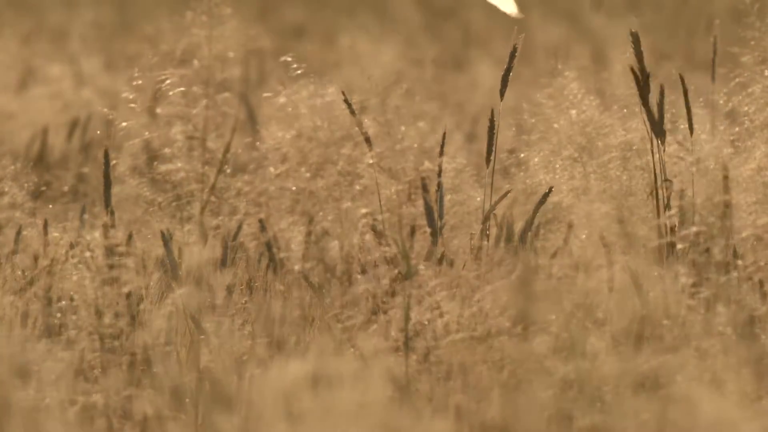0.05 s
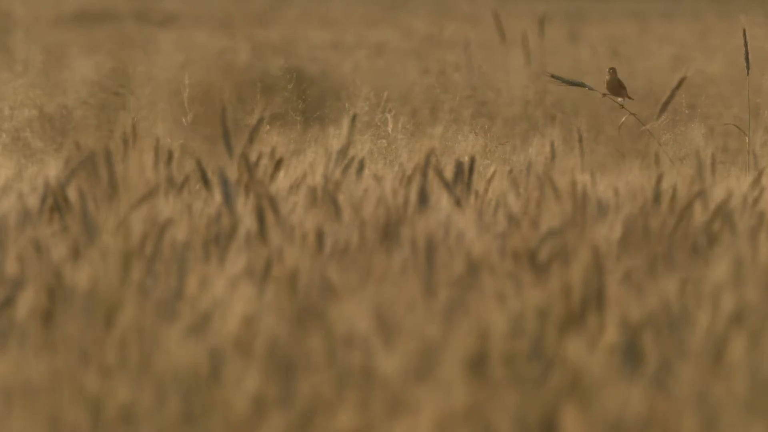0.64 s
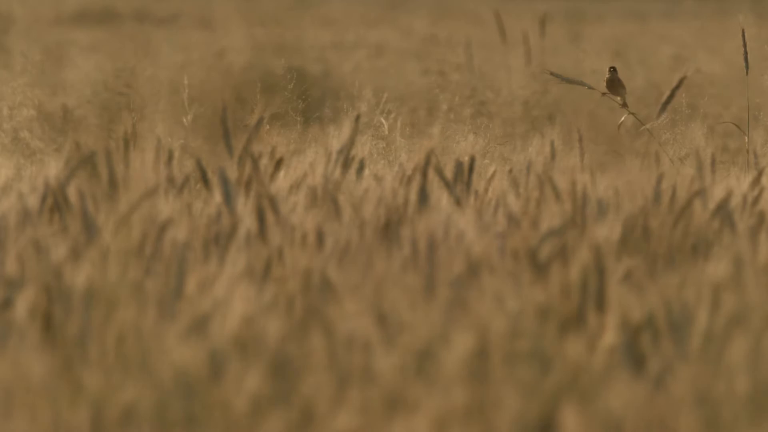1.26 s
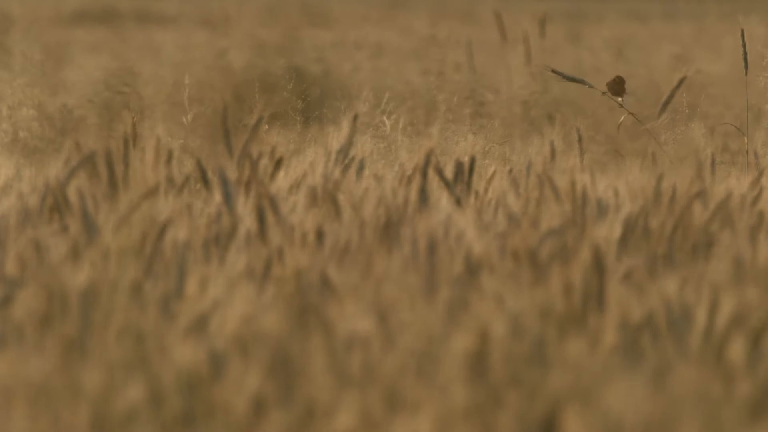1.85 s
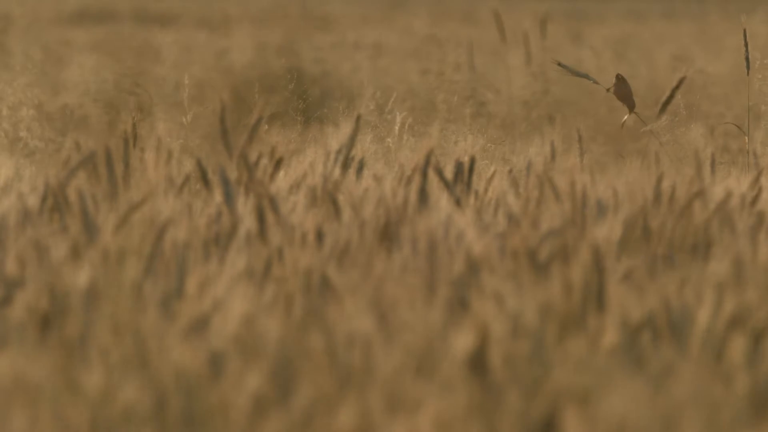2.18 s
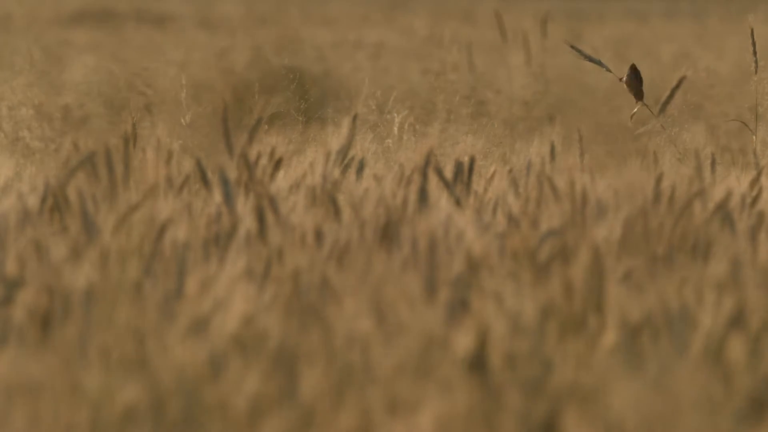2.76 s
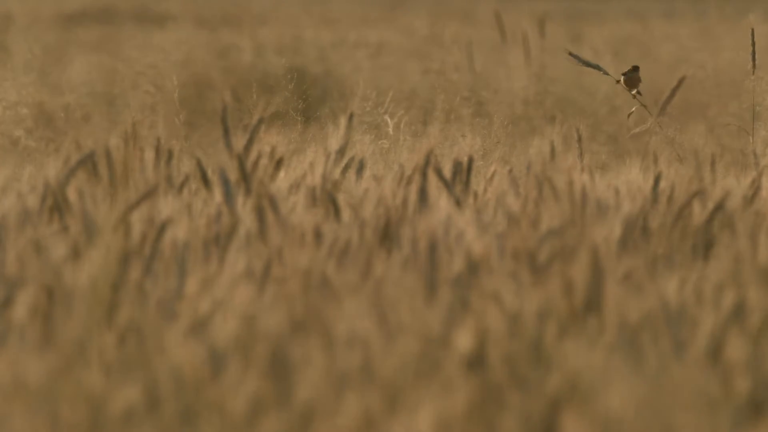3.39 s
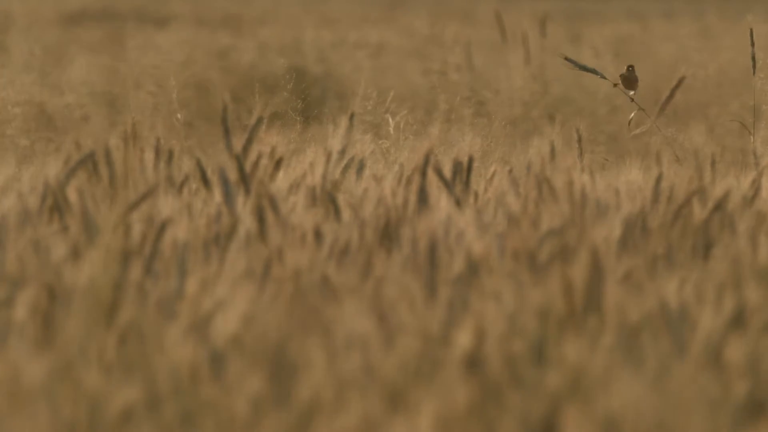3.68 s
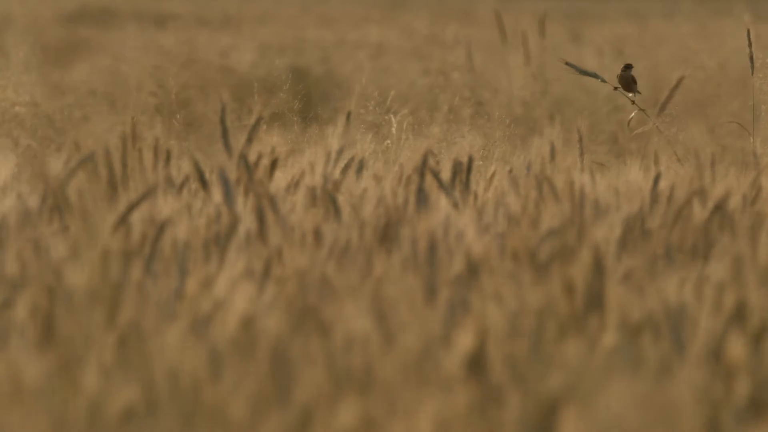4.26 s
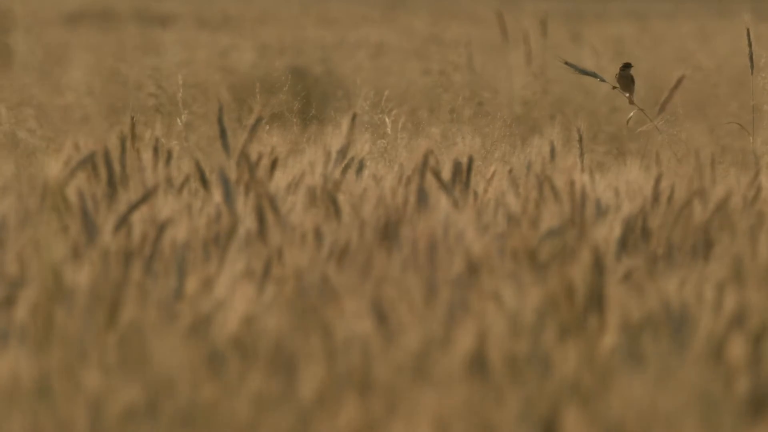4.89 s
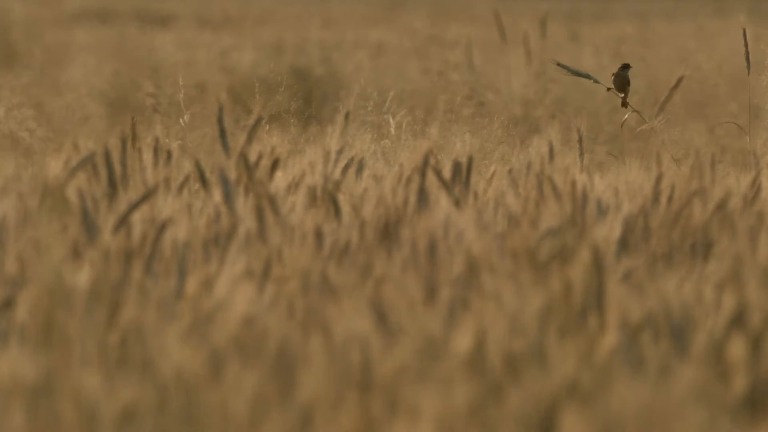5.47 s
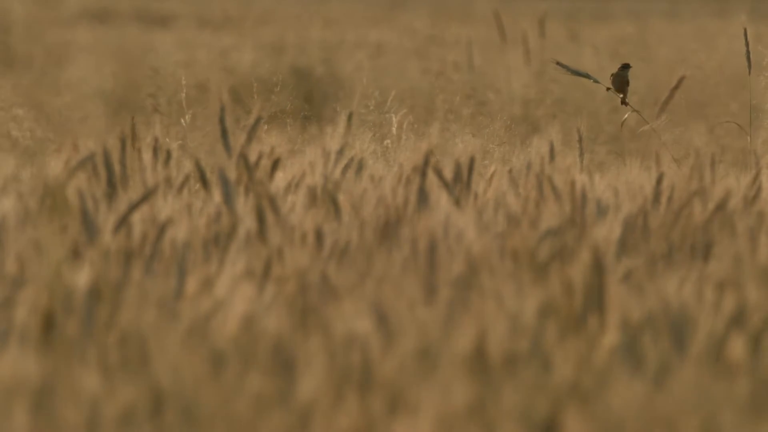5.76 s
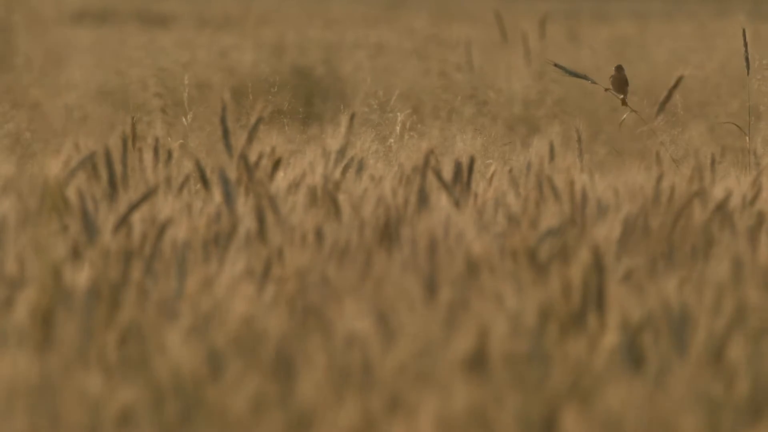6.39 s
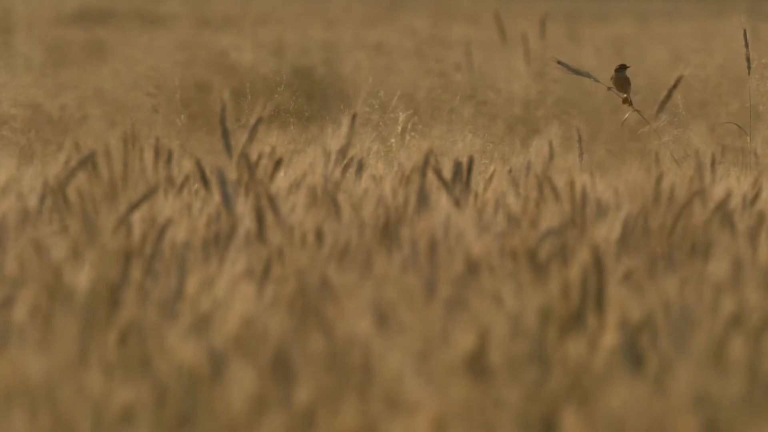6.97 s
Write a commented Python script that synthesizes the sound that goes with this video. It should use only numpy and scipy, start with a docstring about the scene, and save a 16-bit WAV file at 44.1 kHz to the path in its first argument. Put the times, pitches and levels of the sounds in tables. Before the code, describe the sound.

A small bird sings a long, hurried song of chirps, buzzy trills and whistles in an open field over a faint low rumble.

```python
"""A small bird sings a long, hurried song from a stalk in a grain field: slurs, chips and buzzy trills.
Its syrinx glides a near-pure tone; fast pitch sweeps, muted on the upstroke, make the buzz.
The stalks scatter each note and the open field adds a faint tail.
Under it lie a distant rumble, a faint hum, even hiss, a gust buffeting the microphones, and far birds."""
import sys
import numpy as np
from scipy import signal
from scipy.fft import rfft, irfft
from scipy.io import wavfile

SR = 44100
rng = np.random.default_rng(int(sys.argv[2]) if len(sys.argv) > 2 else 0)


def output_pcm(signal):
    """Save a mono or channel-first signal as 16-bit PCM at the path in sys.argv[1].

    Samples are clipped to [-1, 1] before scaling.
    """
    pcm = np.clip(np.atleast_2d(signal).T, -1, 1) * 32767
    wavfile.write(sys.argv[1], SR, np.round(pcm).astype(np.int16))


N = 319283
TIME = np.arange(N) / SR
FREQS = np.fft.rfftfreq(N, 1 / SR)


def gain_of(db):
    return 10 ** (np.asarray(db) / 20)


def unit_rms(x):
    return x / np.sqrt(np.mean(x ** 2) + 1e-20)


def over_freqs(points):
    hz, value = np.transpose(points)
    return np.interp(np.log(FREQS + 1), np.log(hz + 1), value)


def envelope(points):
    return gain_of(np.interp(TIME, *np.transpose(points)))


def add(mix, start_s, sound):
    part = mix[max(0, round(start_s * SR)):][:len(sound)]
    part += sound[:len(part)]


def wander(cutoff_hz):
    """Low-passed random drift, rms 1."""
    return unit_rms(irfft(rfft(rng.standard_normal(N)) / (1 + (FREQS / cutoff_hz) ** 4), N))


def stereo_noise(spectrum, correlation):
    """Shaped left and right noise, rms 1."""
    left, independent = rfft(rng.standard_normal((2, N)))
    right = correlation * left + np.sqrt(1 - correlation ** 2) * independent
    return unit_rms(irfft(np.array([left, right]) * gain_of(over_freqs(spectrum)), N))


def scatter(sound, delay_s, t60_s):
    """Many weak, decaying reflections, different at each microphone."""
    t = np.arange(SR) / SR
    taps = rng.standard_normal((2, SR)) * (t > delay_s) * gain_of(-60 * t / t60_s)
    taps /= np.linalg.norm(taps, axis=1, keepdims=True)
    return signal.fftconvolve(sound[None], taps, axes=1)[:, :N]


# rumble spectrum: freq_hz, relative_db
RUMBLE_SPECTRUM = [(12, -47.5), (20, -3.5), (25, -8), (32, -11), (69, -10), (97, -17), (152, -21.5),
                   (307, -28), (671, -32.5), (1700, -40), (2210, -70), (3740, -120)]
# left-right likeness: freq_hz, correlation
RUMBLE_CORRELATION = [(60, 0.16), (110, 0.27), (220, -0.0011), (420, 0.078), (810, 0.0069), (1550, 0.022),
                      (2970, 0.74), (5690, 0.63)]
def distant_rumble(level_db=-52):
    """Steady low noise of the air over the field."""
    return gain_of(level_db) * stereo_noise(RUMBLE_SPECTRUM, over_freqs(RUMBLE_CORRELATION))


# hum envelope: time_s, level_db
HUM_LEVELS = [(0, -73.5), (3.8, -73), (4.3, -65), (5.2, -68.5), (6, -80)]
def distant_hum(pitch_hz=154.4, waver=0.01205):
    """One low, wavering tone."""
    wavering_hz = pitch_hz * (1 + waver * wander(7.82))
    return envelope(HUM_LEVELS) * unit_rms(np.sin(2 * np.pi * np.cumsum(wavering_hz) / SR))


# hiss spectrum: freq_hz, relative_db
HISS_SPECTRUM = [(1300, -36), (1800, 4), (3000, 1.5), (5000, -1.5), (7000, -5), (10000, -5.5), (15500, -8)]
def hiss(level_db=-66.5):
    """Even, wide treble noise."""
    return gain_of(level_db) * stereo_noise(HISS_SPECTRUM, correlation=0.066)


# gust envelope: time_s, level_db
GUST_LEVELS = [(0, -46), (2.9, -53), (3.7, -39.5), (4.4, -44.5), (4.8, -30), (5.4, -26), (5.85, -33.5),
               (6.2, -19), (6.6, -29), (6.8, -29.5), (7.2, -34)]
# buffeting spectrum: freq_hz, relative_db
BUFFET_SPECTRUM = [(1, -24.5), (6, 2.5), (14, -7), (26, -17.5), (42, -31.5), (100, -57.5), (250, -101)]
def wind(left_db=2.5, right_db=-0.6):
    """Slow eddies push on both microphones, mostly below hearing."""
    eddies = stereo_noise(BUFFET_SPECTRUM, correlation=1.0)
    return envelope(GUST_LEVELS) * gain_of([[left_db], [right_db]]) * eddies


# far twittering: start_s, end_s, pitch_hz, spread_hz, notes_per_s, level_db
TWITTERS = [(0, 7.2, 4970, 171, 60, -70), (0, 7.2, 3304, 350, 60, -68), (0.98, 1.16, 5740, 300, 40, -66),
            (1.2, 1.76, 7260, 500, 45, -73)]
def far_birds(shortest_s=0.0045, extra_s=0.0251, spread_db=3, direct_db=-5):
    """Short random slurs from across the field, half lost in their own echo."""
    song = np.zeros(N)
    for start_s, end_s, pitch_hz, spread_hz, notes_per_s, level_db in TWITTERS:
        for k in range(int((end_s - start_s) * notes_per_s)):
            size = int(SR * (shortest_s + extra_s * rng.random()))
            glide_hz = np.linspace(*rng.normal(pitch_hz, spread_hz, 2), size)
            slur = np.hanning(size) * np.sin(2 * np.pi * np.cumsum(glide_hz) / SR)
            onset_s = start_s + (k + rng.random()) / notes_per_s
            add(song, onset_s, gain_of(rng.normal(level_db, spread_db)) * slur)
    return gain_of(direct_db) * song + scatter(song, delay_s=0.0032, t60_s=0.26)


def syrinx(note, drift, edge_s=0.0007, jitter=0.0082, shimmer_db=1.0, depth_jitter=0.11, overtone_db=-44):
    """A near-pure tone on a pitch arc; in a trill it sweeps down and snaps back, muted."""
    start_s, length_s, *arc_points_hz, level_db, swell_db, sweeps_per_s, depth_hz, falling, muting = note
    t = np.arange(int(length_s * SR)) / SR
    progress = t / length_s
    pitch_drift, level_drift, depth_drift = drift[:, (int(start_s * SR) + np.arange(len(t))) % N]
    cycle = sweeps_per_s * (t + 0.055 / 150 * level_drift) % 1  # the fastest buzzes are the least even
    falling = np.clip(falling, .05, .95)
    arc_hz = np.polyval(np.polyfit([0, .5, 1], arc_points_hz, 2), progress)
    sweep_hz = depth_hz * (1 + depth_jitter * depth_drift) * np.interp(cycle, [0, falling, 1], [1, -1, 1])
    phase = 2 * np.pi * np.cumsum(arc_hz * (1 + jitter * pitch_drift) + sweep_hz) / SR
    tone = np.sin(phase) + gain_of(overtone_db) * np.sin(2 * phase)
    shut = np.interp(cycle / falling, [0, .2, .8, 1], [1, 0, 0, 1])
    pressure = np.sin(np.pi * progress) ** 0.16 * np.minimum(1, np.minimum(t, length_s - t) / edge_s)
    gain = gain_of(level_db + swell_db * (progress - .5) + shimmer_db * level_drift)
    return gain * pressure * (1 - muting * shut) * tone


def throat_tilt_db(from_hz, to_hz, best_hz=3830, octave_off_db=-11.5):
    """A glide swells as it nears the throat's best pitch and fades as it leaves it."""
    return octave_off_db * (np.log2(to_hz / best_hz) ** 2 - np.log2(from_hz / best_hz) ** 2)


def whistle(start_s, length_s, from_hz, mid_hz, to_hz, level_db, swell_db=0):
    """A note without sweeps."""
    return [start_s, length_s, from_hz, mid_hz, to_hz, level_db, swell_db, 0, 0, .5, 0]


def pip(start_s, length_s, pitch_hz, level_db, end_ratio=0.95):
    """A short note, slightly arched."""
    return whistle(start_s, length_s, end_ratio * pitch_hz, pitch_hz, end_ratio * pitch_hz, level_db)


def trill(start_s, length_s, from_hz, mid_hz, to_hz, level_db, sweeps_per_s, depth_hz, falling, muting):
    """A note with fast sweeps; short ones fade, long ones hold more evenly."""
    swell_db = -7 * np.exp(-length_s / 0.13) + throat_tilt_db(from_hz, to_hz)
    return [start_s, length_s, from_hz, mid_hz, to_hz, level_db, swell_db,
            sweeps_per_s, depth_hz, falling, muting]


def chip(start_s, length_s, from_hz, to_hz, level_db):
    """One straight flick of pitch."""
    return whistle(start_s, length_s, from_hz, (from_hz + to_hz) / 2, to_hz, level_db)


def repeat(note, count, every_s, step_db, pitch_ratio=1):
    """One syllable at an even pace, stepping in level and pitch."""
    start_s, length_s, from_hz, mid_hz, to_hz, level_db, *rest = note
    arc_hz = np.array([from_hz, mid_hz, to_hz])
    return [[start_s + k * every_s, length_s, *arc_hz * pitch_ratio ** k, level_db + k * step_db, *rest]
            for k in range(count)]


def runs():
    """Falling buzzes between low pips, a staircase of pips, sinking slurs, a two-note see-saw."""
    low = pip(start_s=0.004, length_s=0.016, pitch_hz=2107, level_db=-58.5)
    buzz = trill(start_s=0.0273, length_s=0.032, from_hz=2980, mid_hz=2700, to_hz=2170, level_db=-47.5,
                 sweeps_per_s=123, depth_hz=422, falling=0.68, muting=0.8)
    stair = pip(start_s=0.323, length_s=0.0106, pitch_hz=3904, level_db=-43)
    slur = whistle(start_s=1.216, length_s=0.018, from_hz=3600, mid_hz=3330, to_hz=2400, level_db=-54.5)
    upper = pip(start_s=4.8844, length_s=0.00723, pitch_hz=2700, level_db=-51.5)
    lower = pip(start_s=4.894, length_s=0.0146, pitch_hz=2140, level_db=-50.5)
    return (repeat(low, count=4, every_s=0.051, step_db=0, pitch_ratio=0.98)
            + repeat(buzz, count=3, every_s=0.051, step_db=-1)
            + repeat(stair, count=4, every_s=0.017, step_db=-3.5, pitch_ratio=0.8)
            + repeat(slur, count=3, every_s=0.021, step_db=-2, pitch_ratio=0.87)
            + repeat(upper, count=3, every_s=0.0313, step_db=0.8)
            + repeat(lower, count=3, every_s=0.0305, step_db=-1.5, pitch_ratio=0.97))


# ticks: start_s, pitch_hz, level_db
TICK_NOTES = [(0.107, 7070, -44), (0.3324, 5480, -45), (1.577, 5130, -46), (1.677, 5800, -43),
              (2.757, 5700, -43.5), (2.9741, 5410, -45), (3.342, 6200, -38.5), (4.73, 6550, -50.5),
              (5.242, 5800, -44.5), (7.178, 5300, -45)]
def ticks(length_s=0.005, end_ratio=0.59, lead_ratio=1.38, lead_db=-14):
    """A steep snap of pitch, led in faintly from higher up."""
    for start_s, pitch_hz, level_db in TICK_NOTES:
        yield chip(start_s - length_s / 2, length_s / 2, lead_ratio * pitch_hz, pitch_hz, level_db + lead_db)
        yield chip(start_s, length_s, pitch_hz, end_ratio * pitch_hz, level_db)


# slurred whistles, the last faint and distant: start_s, length_s, from_hz, mid_hz, to_hz, level_db
WHISTLE_NOTES = [(0.172, 0.048, 3120, 2950, 2780, -57.5), (0.266, 0.023, 3160, 2975, 3030, -48.5),
                 (1.52, 0.024, 2480, 2010, 1900, -56.5), (5.585, 0.029, 5100, 4950, 4750, -59),
                 (6.068, 0.0088, 3830, 3400, 3000, -46), (1.348, 0.052, 3970, 3610, 3424, -43.5),
                 (1.546, 0.021, 2040, 3230, 3410, -49), (1.592, 0.064, 4950, 5044, 4740, -48.5),
                 (1.787, 0.2, 3950, 4188, 4230, -49), (2.537, 0.045, 6100, 4570, 4440, -48),
                 (3.07, 0.03, 6290, 5400, 5000, -46), (3.109, 0.017, 4820, 3890, 4014, -44),
                 (3.126, 0.098, 4430, 4534, 4495, -41), (3.308, 0.014, 2050, 4860, 6300, -53),
                 (3.7105, 0.034, 5290, 4960, 4180, -44.5), (3.9805, 0.0071, 3500, 5070, 6640, -51.5),
                 (3.99, 0.075, 6010, 5530, 4420, -48), (4.193, 0.008, 5660, 5300, 5020, -49),
                 (4.204, 0.044, 5010, 4880, 4150, -45), (4.726, 0.024, 4360, 4440, 3160, -46),
                 (4.752, 0.03, 3280, 4340, 3200, -47), (4.784, 0.031, 3650, 3460, 2780, -47),
                 (5.058, 0.045, 4090, 4500, 4290, -50), (5.0947, 0.04, 4450, 3680, 3410, -45),
                 (5.14, 0.0043, 3840, 4510, 5180, -45), (5.1524, 0.052, 5330, 5130, 5040, -47),
                 (5.275, 0.026, 5850, 6020, 4760, -55.5), (5.482, 0.03, 2800, 2270, 1800, -52.5),
                 (6.15, 0.2, 4420, 4340, 4220, -64.5)]
def whistles(fade_db_per_s=-25):
    """Glides that weaken as they are held, tilted by the throat."""
    for start_s, length_s, from_hz, mid_hz, to_hz, level_db in WHISTLE_NOTES:
        swell_db = throat_tilt_db(from_hz, to_hz) + fade_db_per_s * length_s
        yield whistle(start_s, length_s, from_hz, mid_hz, to_hz, level_db, swell_db)


# pips: start_s, length_s, pitch_hz, level_db
PIP_NOTES = [(0.26, 0.012, 3850, -50), (0.2932, 0.027, 4560, -44), (1.209, 0.022, 4330, -47),
             (2.4764, 0.039, 4980, -50.5), (2.643, 0.012, 3700, -51.5), (2.656, 0.029, 5000, -56.5),
             (2.874, 0.014, 4960, -49.5), (3.4447, 0.02, 4590, -48.5), (3.476, 0.0047, 5500, -48),
             (3.614, 0.0071, 5820, -50.5), (4.156, 0.025, 4460, -49.5), (4.283, 0.009, 3260, -51.5),
             (5.3877, 0.032, 4550, -48), (5.427, 0.011, 3160, -48), (6.041, 0.024, 5090, -55),
             (6.087, 0.0094, 4440, -47), (6.725, 0.012, 3410, -50)]
def pips():
    """Single short notes through the song."""
    return [pip(*row) for row in PIP_NOTES]


# trills: start_s, length_s, from_hz, mid_hz, to_hz, level_db,
# sweeps_per_s, depth_hz, falling_share, muting_share
TRILL_NOTES = [(0.4904, 0.26, 3630, 3860, 3800, -43, 63.6, 270, 0.6, 0.64),
               (0.501, 0.24, 4465, 4540, 4480, -40.5, 63.6, 220, 0.27, 0.7),
               (1.2286, 0.124, 4195, 4190, 4080, -41.5, 64, 140, 0.22, 0.3),
               (1.225, 0.112, 4620, 4780, 4900, -49, 56, 450, 0.15, 0.8),
               (1.78, 0.22, 3650, 3910, 3870, -47.5, 150, 610, 0.52, 0.03),
               (2.0968, 0.11, 4230, 3510, 3240, -49, 88, 143, 0.91, 0.3),
               (2.196, 0.18, 3280, 3100, 3083, -49, 84, 80, 0.69, 0.74),
               (2.731, 0.092, 5320, 5110, 4990, -56.5, 87.3, 240, 0.51, 0.28),
               (3.49, 0.074, 3920, 3750, 3700, -42.5, 136, 500, 0.67, 0.3),
               (3.629, 0.05, 6070, 6090, 5840, -50.5, 61, 410, 0.42, 0.6),
               (3.738, 0.14, 4240, 4268, 4260, -44, 62, 124, 0.41, 0.3),
               (4.292, 0.22, 4100, 4170, 4180, -45.5, 106, 1000, 0.34, 0.76),
               (4.64, 0.051, 3495, 3150, 3420, -45, 194, 550, 0.65, 0.8),
               (5.3, 0.056, 4550, 3710, 3660, -43, 110, 746, 0.98, 0.6),
               (5.441, 0.044, 3740, 3710, 3180, -44.5, 75.3, 590, 0.78, 0.55),
               (5.624, 0.16, 4890, 4850, 4830, -49.5, 52, 343, 0.74, 0),
               (5.779, 0.16, 4530, 4143, 3840, -43.5, 167, 238, 0.78, 0.8),
               (6.1035, 0.052, 4940, 4370, 3980, -46.5, 190, 610, 0.2, 0.37),
               (6.188, 0.16, 3620, 2505, 2125, -48.5, 44, 300, 0.42, 0.36),
               (6.745, 0.063, 4400, 3910, 3720, -43.5, 73, 1160, 0.3, 0.95),
               (6.802, 0.098, 3520, 2940, 2750, -45.5, 50, 380, 0.65, 0.7)]
def trills():
    """Buzzy notes through the song."""
    return [trill(*row) for row in TRILL_NOTES]


# churrs: start_s, level_db, sweeps_per_s
CHURR_NOTES = [(0.843, -43, 130), (0.931, -41, 146), (1.015, -41, 160), (1.111, -43, 136)]
def churrs(length_s=0.047, pitch_hz=3015, swell_db=5, depth_hz=490, falling=0.696, muting=0.82):
    """One swelling buzz about a level pitch, sung four times."""
    for start_s, level_db, sweeps_per_s in CHURR_NOTES:
        yield [start_s, length_s, pitch_hz, pitch_hz, pitch_hz, level_db, swell_db,
               sweeps_per_s, depth_hz, falling, muting]


# low slurs: start_s, length_s, from_hz, level_db
LOW_SLUR_NOTES = [(1.5, 0.052, 3250, -50.5), (1.6865, 0.052, 2600, -50), (2.584, 0.068, 2930, -57.5),
                  (2.75, 0.052, 3195, -49.5), (4.564, 0.045, 3050, -56), (4.631, 0.059, 3200, -53),
                  (6.733, 0.06, 3250, -52), (7.046, 0.046, 2860, -55.5)]
def low_slurs(settle_hz=2371, swell_db=2.5):
    """The other side of the syrinx slides down and settles on one pitch."""
    for start_s, length_s, from_hz, level_db in LOW_SLUR_NOTES:
        mid_hz = settle_hz + 0.297 * (from_hz - settle_hz)
        yield whistle(start_s, length_s, from_hz, mid_hz, settle_hz, level_db, swell_db)


# hooks: break_s, pip_length_s, pip_db, plunge_length_s, plunge_db
HOOK_NOTES = [(2.627, 0.0079, -48, 0.008, -46), (2.909, 0.01, -46.5, 0.0047, -43.5),
              (2.939, 0.01, -48.5, 0.005, -44.5), (2.969, 0.007, -51, 0.0052, -48.5),
              (3.3677, 0.008, -41.5, 0.008, -46), (3.398, 0.012, -59, 0.005, -44.5),
              (4.109, 0.022, -48, 0.014, -46.5)]
def hooks(pip_hz=4220, from_hz=4500, to_hz=2330):
    """A pip breaks off into a plunge."""
    for break_s, pip_length_s, pip_db, plunge_length_s, plunge_db in HOOK_NOTES:
        yield pip(break_s - pip_length_s, pip_length_s, pip_hz, pip_db)
        yield chip(break_s, plunge_length_s, from_hz, to_hz, plunge_db)


# closing whistles: start_s, length_s, level_db
ARCH_NOTES = [(6.435, 0.219, -43.5), (6.986, 0.24, -47.5)]
def arched_whistles(drift, top_hz=4753, jitter=0.006, shimmer_db=1.5, attack_s=0.018, release_s=0.0068):
    """The pitch climbs with a dying vibrato, holds, then dives."""
    climb_hz, climb_s, dive_hz, dive_s = 847, 0.03, 1404, 0.028
    vibrato_per_s, depth_hz, vibrato_s = 59, 380, 0.094
    song = np.zeros(N)
    for start_s, length_s, level_db in ARCH_NOTES:
        t = np.arange(int(length_s * SR)) / SR
        pitch_drift, level_drift, _ = drift[:, (int(start_s * SR) + np.arange(len(t))) % N]
        arc_hz = top_hz - climb_hz * np.exp(-t / climb_s) - dive_hz * np.exp((t - length_s) / dive_s)
        vibrato_hz = depth_hz * np.exp(-(t / vibrato_s) ** 2) * np.cos(2 * np.pi * vibrato_per_s * t)
        pressure = np.minimum(1, np.minimum(t / attack_s, (length_s - t) / release_s))
        tone = np.sin(2 * np.pi * np.cumsum(arc_hz * (1 + jitter * pitch_drift) + vibrato_hz) / SR)
        add(song, start_s, gain_of(level_db + shimmer_db * level_drift) * pressure * tone)
    return song


def bird():
    """The near bird's notes, plus one faint, distant falling whistle."""
    drift = np.array([wander(240), wander(89.5), wander(180)])  # pitch, level, sweep depth
    song = np.zeros(N)
    for note in [*runs(), *ticks(), *whistles(), *pips(), *trills(), *churrs(), *low_slurs(), *hooks()]:
        add(song, note[0], syrinx(note, drift))
    return song + arched_whistles(drift)


def grain_field(song, left_db=-5.3, bounce_db=-8, bounce_s=0.0029, stalks_db=-10, tail_db=-15):
    """The bird sits to the right; near stalks double and blur its notes, the far field answers."""
    pan = gain_of([[left_db], [0]])
    bounces = np.zeros((2, N))
    for channel in bounces:
        for order in (1, 2):
            delay_s = order * bounce_s * (1 + rng.random() / 2)
            add(channel, delay_s, gain_of(bounce_db) / order * song)
    stalks = gain_of(stalks_db) * scatter(song, delay_s=0.00063, t60_s=0.13)
    tail = gain_of(tail_db) * scatter(song, delay_s=0.015, t60_s=0.78)
    return pan * (song + bounces) + np.sqrt(pan) * stalks + tail


def scene():
    return grain_field(bird()) + distant_rumble() + distant_hum() + hiss() + wind() + far_birds()


def record(dry, cutoff_hz=15750):
    """Steep low-pass band limit."""
    lowpass = signal.firwin(511, cutoff_hz, window=("kaiser", 9), fs=SR)
    return signal.oaconvolve(dry, lowpass[None], "same")


dry = scene()
out = record(dry)
output_pcm(out)
```